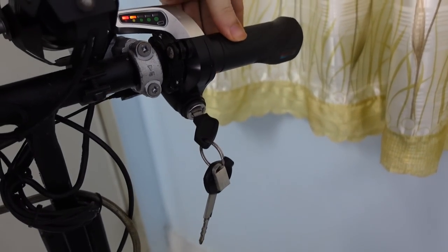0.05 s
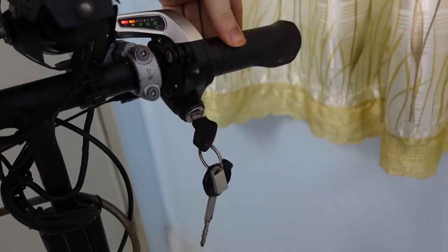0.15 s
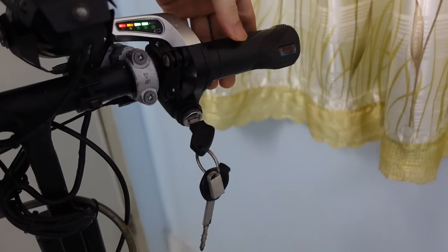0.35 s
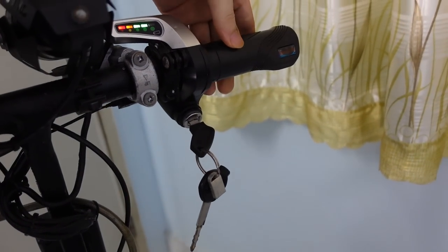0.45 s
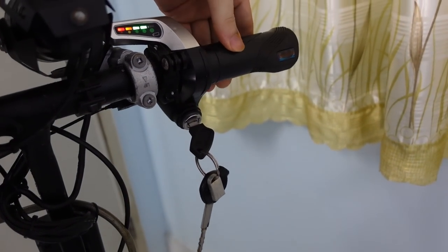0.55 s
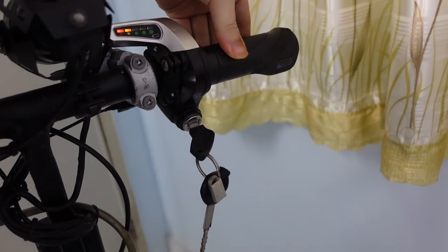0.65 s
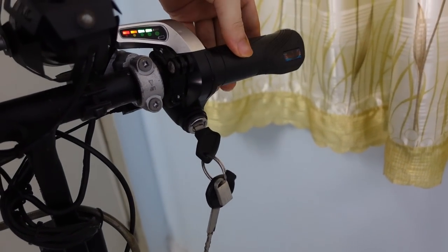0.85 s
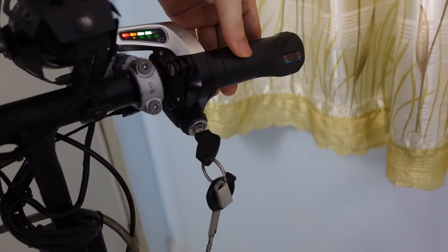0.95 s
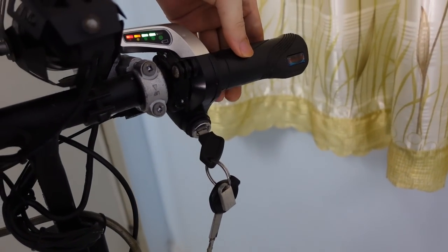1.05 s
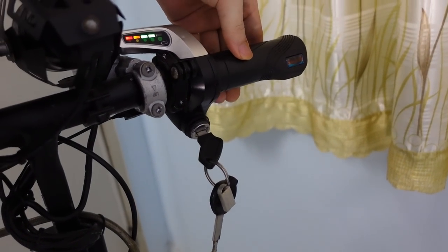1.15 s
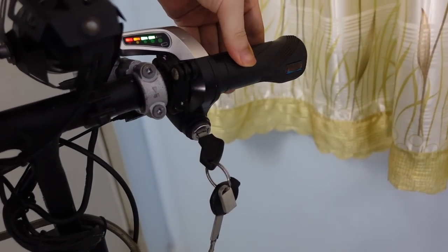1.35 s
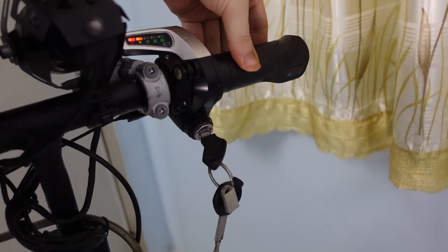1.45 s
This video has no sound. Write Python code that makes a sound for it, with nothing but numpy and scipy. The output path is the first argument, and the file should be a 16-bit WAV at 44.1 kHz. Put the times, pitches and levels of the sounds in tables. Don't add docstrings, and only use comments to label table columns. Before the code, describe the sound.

Close in a quiet room, a motor-driven chain ticks, nearly stops, clatters up to a fast whirring buzz, slows, shudders and surges again, then fades into sparse ticks and a faint last grumble.

```python
import sys
import numpy as np
from scipy import signal
from scipy.fft import rfft, irfft, next_fast_len
from scipy.io import wavfile

SR = 44100
rng = np.random.default_rng(int(sys.argv[2]) if len(sys.argv) > 2 else 0)


def invert_db(level):
    return 10 ** (np.asarray(level, dtype=float) / 20)


def unload_wav(signal):
    wavfile.write(
        sys.argv[1],
        SR,
        np.round(np.clip(np.atleast_2d(signal).T, -1, 1) * 32767).astype(np.int16),
    )


N = 66150


def rms_one(x):
    return x / np.sqrt(np.mean(x ** 2) + 1e-20)


def coloured(white, spectrum):
    hz, db = np.transpose(spectrum)
    grid = np.arange(N // 2 + 1) * SR / N + 1
    gain = invert_db(np.interp(np.log(grid), np.log(hz), db))
    return rms_one(irfft(rfft(white) * gain, N))


def ring(force, hz, t60):
    r, w = invert_db(-60 / (t60 * SR)), 2 * np.pi * hz / SR
    return signal.lfilter([0, np.sin(w)], [1, -2 * r * np.cos(w), r * r], force + 1e-18)


def peak(x, hz, width_hz):
    r = np.exp(-np.pi * width_hz / SR)
    top = np.array([1, 0, -1]) * (1 - r * r) / 2
    return signal.lfilter(top, [1, -2 * r * np.cos(2 * np.pi * hz / SR), r * r], x)


def without_lows(x, low_hz):
    return signal.sosfilt(signal.butter(4, low_hz, "high", fs=SR, output="sos"), x)


# (time [s], link rate [links/s], chain tick level [dB],
# frame load above the ticks [dB], tooth hum level [dB])
DRIVE = [(0, 65.4, -38.5, 8.5, -63), (0.096, 39, -75.5, -10, -68), (0.112, 46.5, -48.5, 22, -43),
         (0.159, 97.6, -39.5, 14, -38.5), (.225, 219, -33, 13.5, -39), (.285, 318, -26.5, 8.5, -45),
         (.378, 237, -30, 6, -41), (.51, 142, -35, 11, -51.5), (.605, 90, -38.5, 8, -50),
         (.69, 52, -48, 3.5, -48), (.76, 106.7, -37, 16.5, -35), (.845, 283, -30.5, 15, -34),
         (0.932, 327, -25.5, 8, -35), (1.025, 255, -30.5, 11.5, -61), (1.14, 201, -32, 8, -45),
         (1.325, 60.6, -41, 5, -58), (1.445, 36, -67.5, 13, -53), (1.5, 69, -46.5, 13, -56)]


def throttle():
    time, *columns = np.transpose(DRIVE)
    return [np.interp(np.arange(N) / SR, time, column) for column in columns]


def links(rate):
    jitter, spread_db = 0.07, 3.5
    turns = np.cumsum(rate) / SR
    luck = rng.standard_normal((400, 30))[:int(turns[-1])]
    seated = np.arange(len(luck)) + 0.5 + jitter * luck[:, 0]
    at = np.interp(seated, turns, np.arange(N)).astype(int)
    return at, invert_db(spread_db * luck[:, 1]), luck[:, 2:]


# (frequency [Hz], level per Hz [dB])
RUSTLE = [(470, 3), (800, -6), (2190, -15), (2540, -15.5), (3140, -14.5), (6210, -11.5), (11000, -18),
          (13600, -17.5), (15600, -43)]
# (frequency [Hz], width [Hz], level [dB])
RINGS = [(2603, 153, -2), (3610, 110, -7), (4086, 67, 0.5), (4583, 61, -2), (5380, 63, -27), (5914, 59, 1),
         (6280, 55, 3), (6840, 60, -10), (7630, 37, -3.5), (8520, 30, -21), (9300, 140, -13),
         (12100, 120, -10), (14400, 280, -13.5)]


def chain(at, size, rate):
    decay_s, bed = 0.0081, 0.55
    rustle_db, rings_db = 2.5, -5.5
    clicks = np.zeros(N)
    clicks[at] = size / np.sqrt(rate[at] * decay_s)
    gate = bed + signal.lfilter([1], [1, -np.exp(-1 / (decay_s * SR))], clicks)
    hiss = gate * coloured(rng.standard_normal(N), RUSTLE)
    rubbing = gate * rng.standard_normal(N)
    rings = 0
    for k, (hz, width_hz, db) in enumerate(RINGS):
        rings = rings + invert_db(db) * peak(rubbing, hz, width_hz) * (-1) ** k
    both = invert_db(rustle_db) * rms_one(hiss) + invert_db(rings_db) * rms_one(rings)
    both = without_lows(both, 520)
    return both - 0.53 * peak(both, 11260, 1300)


FRAME_LOW_HZ = 178
# (frequency [Hz], level [dB], time to fade 60 dB [s])
FRAME = [(207, -14.5, 0.088), (352, -63, .12), (406, -6.5, 0.13), (414.4, -10.5, 0.27), (471.5, -3, 0.15),
         (509.5, 2, 0.12), (557.7, -2, 0.18), (581, -1, 0.054), (706, -5, 0.11), (780, -9.5, 0.061),
         (991, -22.5, 0.18), (1175, -12, 0.08), (1355, -7, 0.038)]


def frame_knocks(at, size, luck, rate, load_db):
    scrape_share, mode_spread, frame_db = 0.54, 0.89, -1
    slow_tilt_db = -1.5
    scrape = rng.standard_normal(N) * np.sqrt(200 / SR)
    slowing = np.clip(np.log2(200 / rate), -1, 2)
    total = 0
    for k, (hz, level_db, t60) in enumerate(FRAME):
        knocks = scrape_share * scrape
        chance = (0.5 + mode_spread * luck[:, k]) * (-1) ** k
        knocks[at] += np.sqrt(size) * chance * np.sqrt(200 / rate[at])
        push_db = load_db - 13.5 + slow_tilt_db * np.log2(hz / 500) * slowing
        total = total + invert_db(level_db) * ring(knocks * invert_db(push_db), hz, t60)
    return invert_db(frame_db) * without_lows(total, FRAME_LOW_HZ)


# (multiple of link rate, level under frame load [dB])
WHINE = [(2, -17.5), (3, -20.5)]


def tooth_whine(rate, load_db):
    hz, width_hz = 522, 95
    phase = 2 * np.pi * np.cumsum(rate) / SR
    force = sum(invert_db(load_db + db + 18) * np.sin(order * phase) for order, db in WHINE)
    return peak(peak(force, hz, width_hz), hz, 2 * width_hz)


# (multiple of link rate, level [dB])
HUM_ORDERS = [(.5, -9), (1, -1)]
# (frequency [Hz], width [Hz], level [dB])
BOOM = [(118.5, 10, 4.5), (194.2, 39, 5), (323, 38, 5)]


def tooth_hum(rate, hum_db):
    phase = 2 * np.pi * np.cumsum(rate) / SR
    force = invert_db(hum_db + 3) * sum(invert_db(db) * np.sin(order * phase) for order, db in HUM_ORDERS)
    boom = sum(invert_db(db) * peak(force, hz, width_hz) for hz, width_hz, db in BOOM)
    return 0.15 * force + boom


def room_echo(x):
    t60_s, wall_cut_hz, room_db = 0.26, 6300, -15
    size = next_fast_len(N + SR)
    z = np.exp(-2j * np.pi * np.arange(size // 2 + 1) / size)
    dull = np.exp(-2 * np.pi * wall_cut_hz / SR)
    echo = 0
    for k, lag in enumerate(rng.uniform(0.008, 0.03, 10) * SR // 1):
        loss = invert_db(-60 * lag / SR / t60_s)
        loop = loss * (1 - dull) / (1 - dull * z) * z ** lag
        echo = echo + (-1) ** k * loop / (1 - loop)
    return invert_db(room_db) * irfft(rfft(x, size) * echo, size)[:N]


# (frequency [Hz], level per Hz [dB])
FLOOR = [(20, -19), (27, 3.5), (36, -4), (55, 1), (130, -9.5), (210, -8), (330, -36.5), (15000, -48)]


def room_floor():
    return invert_db(-49) * coloured(rng.standard_normal(N), FLOOR)


# (time [s], peak level [dB])
JOLTS = [
    (0.113, -20),
    (0.216, -8),
    (0.246, -9),
    (0.287, -7.5),
    (0.384, -13.5),
    (0.842, -10),
    (0.924, -11.5),
    (1.135, -12.5),
    (1.167, -50),
]


def slack_jolts():
    smear_s, cut_hz, jolt_db = 0.004, 1230, -10.5
    time, db = np.transpose(JOLTS)
    odds = rng.standard_normal((len(time), 14))
    total = 0
    for k, (hz, level_db, t60) in enumerate(FRAME):
        hits = np.zeros(N)
        late = smear_s * np.abs(odds[:, -1 - k])
        hits[((time + late) * SR).astype(int)] = invert_db(db + 3.5 * odds[:, k]) * (-1) ** k
        total = total + invert_db(level_db) * ring(hits, hz, t60)
    soft = signal.butter(2, cut_hz, fs=SR, output="sos")
    return invert_db(jolt_db) * without_lows(signal.sosfilt(soft, total), FRAME_LOW_HZ)


# (time [s], level [dB])
BITES = [
    (0.113, -37),
    (0.72, -32),
    (0.758, -30),
    (1.453, -41.5),
    (1.47, -43),
]


def motor_bites():
    attack_s, decay_s = 0.0015, 0.029
    t, shape = np.arange(N) / SR, 0
    for time, db in BITES:
        since = np.clip(t - time, 0, None)
        shape = shape + invert_db(db) * (1 - np.exp(-since / attack_s)) * np.exp(-since / decay_s)
    grit = rng.standard_normal(N) * (rng.random(N) < 1500 / SR)
    band = signal.butter(3, [300, 1710], "band", fs=SR, output="sos")
    boom = invert_db(16) * peak(shape * rms_one(grit), 186, 30.0)
    return shape * rms_one(signal.sosfilt(band, grit)) + boom


def scene():
    rate, tick_db, load_db, hum_db = throttle()
    frame_db = tick_db + load_db
    at, size, luck = links(rate)
    drive = invert_db(tick_db) * chain(at, size, rate)
    drive = drive + frame_knocks(at, size, luck, rate, frame_db)
    drive = drive + tooth_whine(rate, frame_db) + tooth_hum(rate, hum_db)
    drive = drive + slack_jolts() + motor_bites()
    return (drive + room_echo(drive) + room_floor())[None]


def low_pass(x):
    return signal.sosfilt(signal.butter(12, 15730, fs=SR, output="sos"), x)


def record(dry):
    top_cut = signal.cheby2(N=10, rs=40, Wn=15850, fs=SR, output="sos")
    mix = signal.sosfilt(top_cut, dry)
    return low_pass(mix)


dry = scene()
out = record(dry)
unload_wav(out)
```